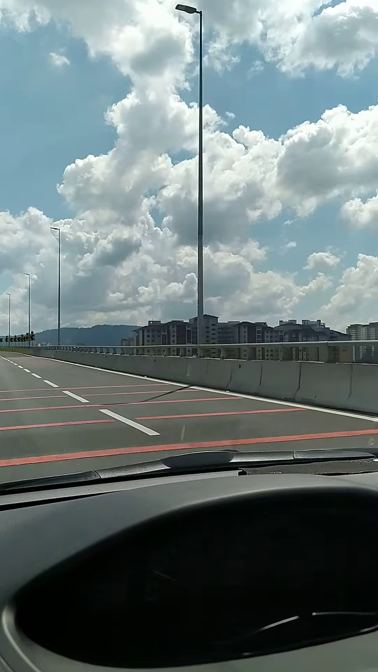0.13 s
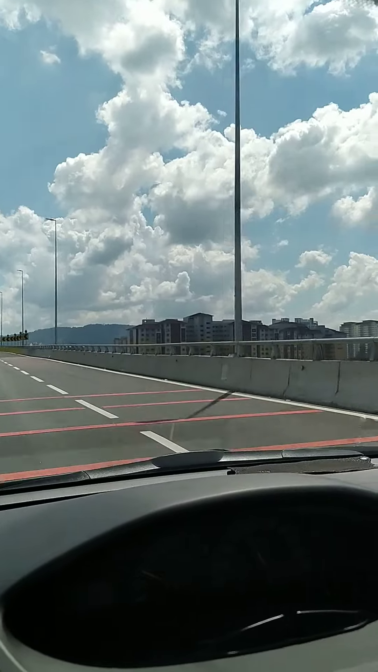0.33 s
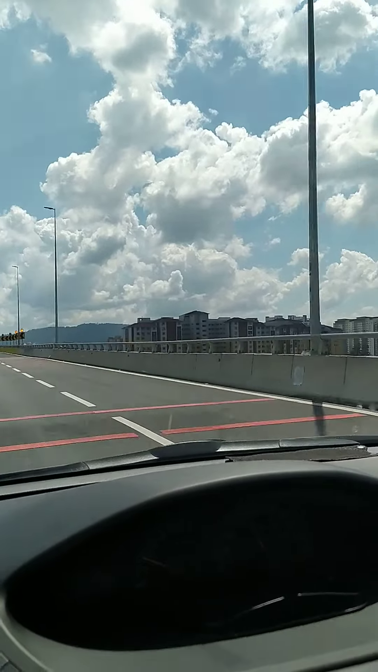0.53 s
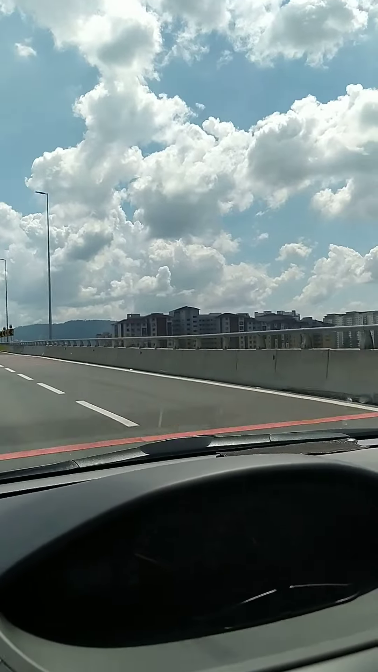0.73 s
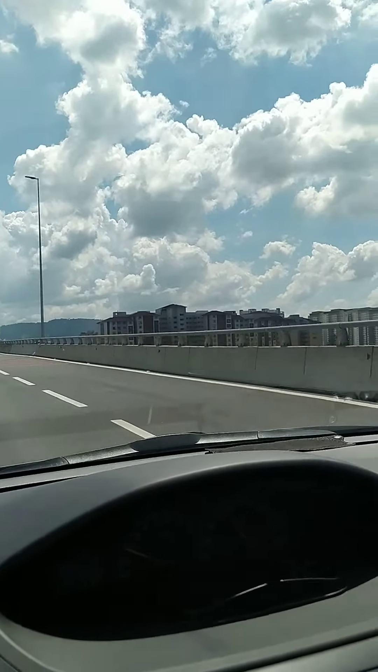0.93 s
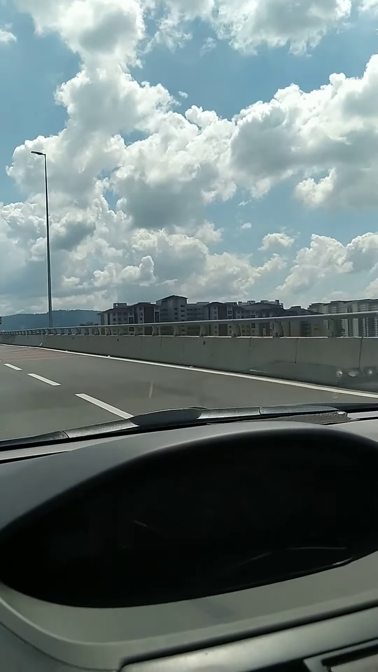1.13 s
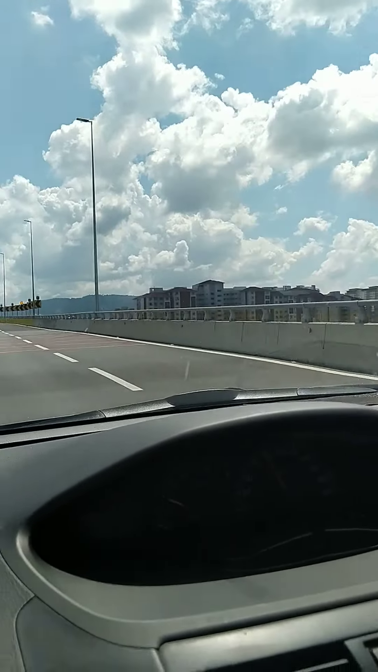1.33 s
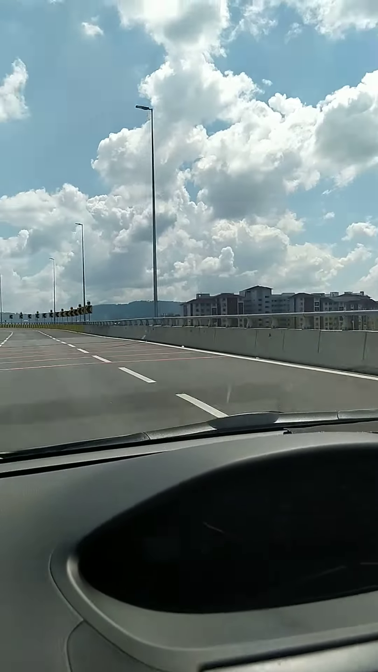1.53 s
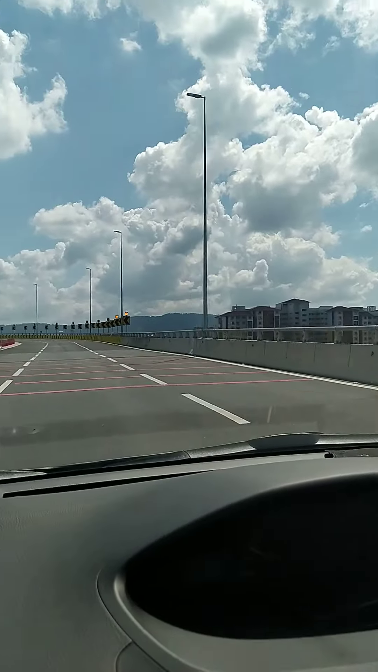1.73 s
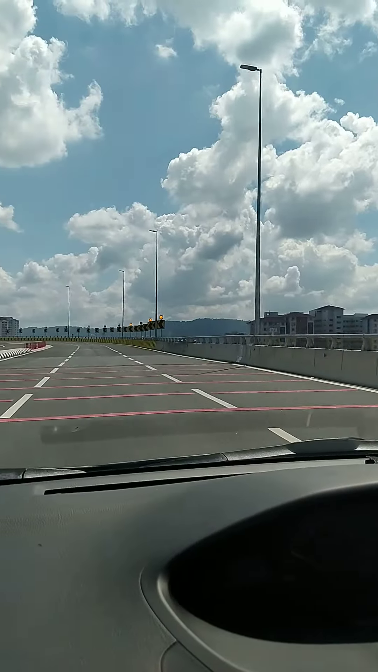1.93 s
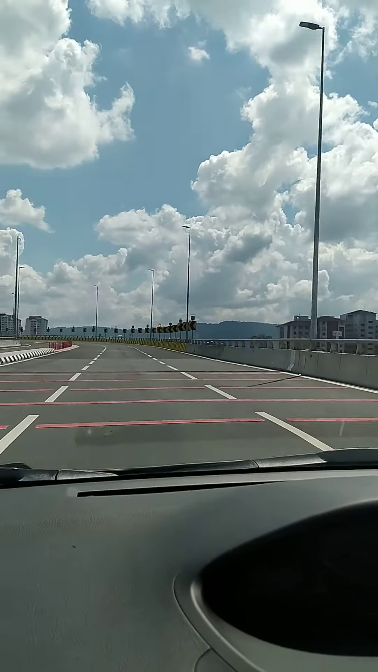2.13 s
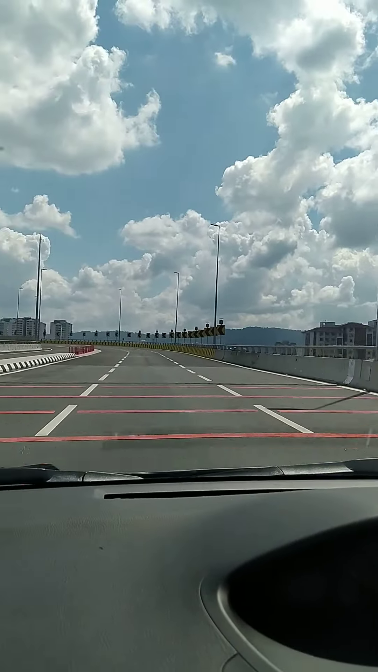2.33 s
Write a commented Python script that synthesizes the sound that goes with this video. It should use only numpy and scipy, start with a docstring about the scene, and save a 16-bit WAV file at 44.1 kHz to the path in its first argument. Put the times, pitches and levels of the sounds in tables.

```python
"""Car crossing raised strips

Inside a car at steady speed, front then rear tyres cross six evenly spaced raised strips, heard by a phone
near the dashboard. Impulses ring damped modes of the body shell, cabin panels and front wheel arch; shaped
noise bursts make loose trim rattle, and a last one gives a faint, very bright tick near the end. Behind them lie
road roar in flickering noise bands, narrow hums, a wavering drone and a brief treble rustle, in two channels."""
import sys
import numpy as np
from scipy import signal
from scipy.fft import rfft, irfft
from scipy.io import wavfile
from scipy.ndimage import uniform_filter1d

SR = 44100
rng = np.random.default_rng(int(sys.argv[2]) if len(sys.argv) > 2 else 0)


def dump_mix(stems):
    """Bounce the given channels to the path in sys.argv[1] as a 16-bit WAV at rate SR."""
    frames = np.atleast_2d(stems).T  # one column per channel
    limited = np.clip(frames, -1, 1)  # hard clip at full scale
    pcm = np.round(limited * 32767).astype(np.int16)
    wavfile.write(sys.argv[1], SR, pcm)


N = 108045
T = np.arange(N) / SR  # s
BIN_HZ = np.fft.rfftfreq(N, 1 / SR) + 1  # one hertz up, so that logarithms exist at zero

# Loose parts knocking on panels and wheel arch:
# (time [s], relative level on high modes and arch [dB], relative level on low modes [dB])
KNOCKS = [(.588, -34.5, -33), (0.487, -45, -31.5), (.515, -49, -30.5), (.624, -28.5, -30), (.650, -38, -24),
          (.783, -39, -32), (.804, -24.5, -21), (.841, -29.5, -36), (.875, -31, -27), (.935, -26.5, -22),
          (.958, -24, -25.5), (1.084, -28.5, -31), (1.111, -30, -24), (1.25, -28, -25.5),
          (1.283, -34, -25.5), (1.316, -41, -38), (1.410, -46, -25.5), (1.428, -24.5, -31.5),
          (1.481, -45, -25.5), (1.53, -37, -33)]


def undb(db):
    """Decibels are twenty times the decimal logarithm of an amplitude ratio."""
    return 10 ** (np.asarray(db) / 20)


def level(x, db):
    """Root-mean-square normalisation sets the level of a steady signal."""
    return x * undb(db) / np.sqrt(np.mean(x ** 2))


def along(table):
    """Interpolation on a logarithmic frequency axis reads a (frequency [Hz], value) table at every bin."""
    hz, value = np.array(table, float).T
    return np.interp(np.log(BIN_HZ), np.log(hz), value)


def ring(x, hz, t60):
    """A damped mode is a two-pole resonator: a unit kick gives a sine of initial swing 1 that decays."""
    radius = np.exp(-np.log(1000) / (t60 * SR))
    angle = 2 * np.pi * hz / SR
    return signal.lfilter([0, radius * np.sin(angle)], [1, -2 * radius * np.cos(angle), radius ** 2], x)


def band(x, hz, width):
    """A resonance passes a band whose width is its centre frequency over its quality factor."""
    return signal.lfilter(*signal.iirpeak(min(hz, .45 * SR), hz / width, fs=SR), x)


def walk(rate):
    """Low-passed noise: random levels held 1 / rate s and smoothed twice, with a spread near 1."""
    hold = int(SR / rate)
    steps = np.repeat(rng.standard_normal(N // hold + 1), hold)
    return 1.123 * uniform_filter1d(uniform_filter1d(steps, hold), hold)[:N]


def kicks(times, db):
    """Ideal impulses: one-sample blows excite all modes at once."""
    out = np.zeros(N)
    np.add.at(out, (np.asarray(times) * SR).astype(int), undb(db))
    return out


def soft(push):
    """Contact compliance: rubber and plastic spread a blow over a fraction of a millisecond."""
    return uniform_filter1d(uniform_filter1d(push, size=19), size=19)


def axles():
    """Wheelbase delay: each strip strikes the front tyres, then the rear tyres a fixed lag later."""
    first_strip_s, strip_period_s, axle_lag_s, strips = .4455, .15682, .14232, 6
    # Strength of the blow at each strip: (front axle [dB], rear axle [dB])
    strip_blows = [(-0.4, 0.1), (0, 0.9), (-2.5, -1), (-2.3, -1.2), (-2, -1.8), (-1.7, 1.2)]
    times = first_strip_s + strip_period_s * np.arange(strips)
    front_db, rear_db = np.array(strip_blows).T
    return kicks(times, front_db), kicks(times + axle_lag_s, rear_db)


def shell():
    """Modal superposition: each axle swings the body modes in its own fixed senses, as a deep boom."""
    # Body shell modes: (frequency [Hz], T60 [s], signed swing per unit front blow, per unit rear blow)
    shell_modes = [(20.11, 0.733, 0.035, 0.011), (25.14, 0.722, 0.05, -0.271),
                   (27.65, 0.635, -0.039, 0.338), (35.11, 0.588, -0.14, -0.241),
                   (43.42, 0.142, 0.102, 0.369), (50.78, 1.2, -0.044, 0.021), (66.48, 1.168, 0.02, -0.09),
                   (69.08, 0.699, -0.051, 0.091), (76.04, 1.2, -0.019, 0.036),
                   (87.73, 0.294, -0.007, 0.123), (101.32, 0.336, 0.023, 0.118),
                   (116.79, 1.2, -0.017, 0.029), (126.36, 1.2, 0.002, -0.022)]
    front, rear = axles()
    return sum(ring(front_swing * front + rear_swing * rear, hz, t60)
               for hz, t60, front_swing, rear_swing in shell_modes)


def panels():
    """Forced modal vibration: blows, the suspension's shudder and knocking parts ring the cabin panels."""
    kick_gain, shudder_gain, low_modes_hz = 0.33, 3.56, 380
    # Panel modes: (frequency [Hz], T60 [s], relative front-blow level [dB], relative rear-blow level [dB],
    # decay constant of the shudder [s])
    panel_modes = [(154, 0.24, -29, -31.5, 0.1), (191.7, 0.37, -31.5, -39.5, 0.097),
                   (238.8, 0.28, -33.5, -32, 0.046), (285, 0.081, -30, -39, 0.046),
                   (347, 0.092, -33, -43, 0.065), (415.5, 0.1, -30.5, -58, 0.031),
                   (485.5, 0.077, -36.5, -70, 0.045), (609, 0.055, -35, -56, 0.032),
                   (731, 0.062, -35, -39.5, 0.023), (906, 0.027, -35, -39.5, 0.025)]
    front, rear = axles()
    rows = np.array(KNOCKS)
    out = 0
    for hz, t60, front_db, rear_db, shudder_s in panel_modes:
        shake = rng.standard_normal(N)
        blows = undb(front_db) * front + undb(rear_db) * rear
        shudder = signal.lfilter([1], [1, -np.exp(-1 / (shudder_s * SR))], blows) / np.sqrt(shudder_s * SR)
        knock = kicks(rows[:, 0], rows[:, 2 if hz < low_modes_hz else 1])
        impacts = soft(kick_gain * blows + knock * np.sign(shake))  # each knock has a random sense
        out = out + ring(impacts + shudder_gain * shudder * shake, hz, t60)
    return out


def clunk():
    """Cavity resonance: front tyres climbing and leaving each strip, and knocking parts, ring a hollow arch."""
    crossing_s, drop_gain = 0.0083, 0.86  # the drop off the far edge: its delay and relative strength
    blow_db, knock_db = -26, -2  # gain of a front blow; share of a knock that reaches the arch
    # Modes of the hollow front wheel arch: (frequency [Hz], T60 [s], relative level [dB])
    arch_modes = [(423, 0.13, -16), (635, 0.066, -10.5), (699, 0.11, -0.5), (746, 0.096, -0.5),
                  (832, 0.049, -5.5)]
    rows, front = np.array(KNOCKS), axles()[0]
    drop = drop_gain * np.roll(front, int(crossing_s * SR))
    knock = kicks(rows[:, 0], rows[:, 1] + knock_db)
    push = soft(undb(blow_db) * (front + drop) + knock)
    return -sum(undb(db) * ring(push, hz, t60) for hz, t60, db in arch_modes)


def trim():
    """Impact noise: short grainy bursts, mostly loose plastic chattering, with its own grain in each octave."""
    rise_s, tail_s, tail_db = 0.0063, 0.055, -10.5  # the tail is a weaker, slower second decay
    bursts_db, grain_db, chatter_db = -12.5, 0.1, 2.5
    # Rattles, and last a faint, very bright tick near the end:
    # (onset [s], relative level [dB], decay constant [s], tilt about 4 kHz [dB per octave])
    noise_bursts = [(0.469, -40.5, 0.012, -3.5), (0.612, -36, 0.03, 0), (0.64, -34.5, 0.016, 1.3),
                    (0.665, -40, 0.022, 0), (0.694, -40, 0.014, -1), (0.754, -34, 0.021, 0.5),
                    (0.776, -27, 0.024, -0.5), (0.792, -25, 0.017, 1.2), (0.825, -29.5, 0.015, 0),
                    (0.867, -28.5, 0.0095, -1), (0.908, -36, 0.012, 0), (0.9346, -21.5, 0.013, 0.8),
                    (0.952, -24.5, 0.0069, 1.5), (0.984, -32.5, 0.014, 2.5), (1.028, -38.5, 0.012, 1),
                    (1.072, -34.5, 0.012, 1.5), (1.09, -30, 0.017, -0.5), (1.1083, -25.5, 0.0083, 4.5),
                    (1.17, -31, 0.0099, -0.5), (1.227, -32.5, 0.02, 1), (1.245, -30.5, 0.012, -0.5),
                    (1.259, -27, 0.024, 2), (1.297, -32.5, 0.016, 0), (1.337, -40, 0.02, 3),
                    (1.382, -33.5, 0.03, 1), (1.403, -28.5, 0.0099, -0.5), (1.4166, -22.5, 0.016, 0.8),
                    (1.454, -31.5, 0.02, -0.5), (1.488, -40, 0.013, 1), (2.431, -50, 0.014, 8)]
    # Colour of the bursts: (frequency [Hz], relative spectral density [dB per Hz])
    trim_colour = [(530, -14), (900, 1), (1200, 0), (1370, 2), (1910, -6.5), (2170, -3), (3140, -9.5),
                   (4180, -12), (5240, -16), (8550, -16), (9290, -15.5), (11400, -28.5), (11900, -38),
                   (15000, -45), (15500, -46)]
    # Resonant bumps in the colour: (frequency [Hz], width [Hz], height [dB])
    trim_bumps = [(1350, 140, 1.5), (2150, 250, 0), (4250, 150, 3.5), (9430, 650, 4)]
    rows = np.array(noise_bursts)
    # Power envelopes: an exponential rise, then the two decays
    since_peak = T - rows[:, :1] - rise_s
    twice_away = 2 * abs(since_peak)
    fall = np.exp(-twice_away / np.maximum(rows[:, 2:3], .002))
    fall = fall + undb(2 * tail_db) * np.exp(-twice_away / tail_s)
    shapes = np.where(since_peak < 0, np.exp(-twice_away / rise_s), fall)
    # Single contacts, 40 samples each, differ in size
    sizes = np.repeat(np.minimum(rng.exponential(size=N // 40 + 1), 3.0), 40)[:N]
    contacts = undb(chatter_db * sizes - chatter_db)
    bumps = sum(db / (1 + ((BIN_HZ - f) / width * 2) ** 2) for f, width, db in trim_bumps)
    gain = undb(along(trim_colour) + bumps) * np.minimum(BIN_HZ / 900, 1) ** 2
    gain = gain / np.sqrt(np.sum(gain[BIN_HZ > 2500] ** 2) / len(BIN_HZ))  # unit power in the treble
    place = np.clip(np.log2(BIN_HZ / 4000), -2, 2)  # octaves from 4 kHz
    out, shared = 0, walk(300)
    for octave in range(-2, 3):
        power = undb(2 * (rows[:, 1] + bursts_db + octave * rows[:, 3])) @ shapes
        roughness = undb(grain_db * shared + 1.15 * walk(60.0))
        grains = rng.standard_normal(N) * contacts * roughness
        share = np.sqrt(np.clip(1 - abs(place - octave), 0, 1))
        out = out + rfft(grains * np.sqrt(power)) * share
    return irfft(out * gain, N)


def road():
    """Filtered broadband noise: half-octave bands of tyre and wind roar flicker independently, over hums."""
    road_db, swell_db, flicker_db, treble_flicker_db = -26, 0.01, 2, 2  # the shared swell is minute
    hum_width_hz = 7.4
    # Roar over time: (time [s], bass lift below 120 Hz [dB], middle lift up to 3 kHz [dB])
    roar_course = [(0, -2.5, -0.5), (.4, -3.5, -0.5), (.62, 3.5, 1.5), (1.1, 7.5, 4.5), (1.45, 3, 3.5),
                   (1.56, 7, 0.5), (1.62, -2, 0.1), (1.8, 0, -0.5), (2.05, 1.5, 0), (2.25, -2, 0.5),
                   (2.45, -4, 0.6)]
    # Roar spectrum: (frequency [Hz], relative spectral density [dB per Hz])
    road_colour = [(16, -3.5), (43, 3), (60, -6), (76, -11), (113, -4), (151, -9), (190, -5.5),
                   (232, -13.5), (284, -11.5), (338, -20.5), (368, -17.5), (600, -24.5), (756, -24.5),
                   (1200, -32.5), (1420, -36), (1900, -38.5), (2400, -43), (2900, -48.5), (3800, -49.5),
                   (5190, -52.5), (7500, -51), (9230, -47.5), (10500, -56), (11500, -69.5), (13800, -81),
                   (15500, -82)]
    # Engine and tyre-cavity tones: (frequency [Hz], rms level [dB])
    hum_tones = [(188.4, -49), (242.2, -41), (366, -51)]
    rows = np.array(roar_course)
    white = rfft(rng.standard_normal(N))
    swell, out = walk(3.62), 0
    coloured = white * undb(along(road_colour)) * np.minimum(BIN_HZ / 16, 1) ** 2
    scale = undb(road_db) / np.std(irfft(coloured, N))
    for centre in 16 * 2 ** np.arange(0, 10.1, .5):
        share = np.clip(1 - 2 * abs(np.log2(BIN_HZ / centre)), 0, 1)
        lift = np.interp(T, rows[:, 0], rows[:, 1 if centre < 120 else 2])
        common = (lift + swell_db * swell) * (centre < 3000)
        flicker = (flicker_db if centre < 1500 else treble_flicker_db) * walk(12.05)
        out = out + irfft(coloured * share, N) * undb(common + flicker)
    hum = sum(level(band(rng.standard_normal(N), f, hum_width_hz), db) for f, db in hum_tones)
    return scale * out + hum


def drone():
    """Frequency modulation: a low sine wavers in pitch and level as it comes and goes."""
    pitch_hz, waver_hz = 102.3, 4.25
    # Level course: (time [s], mean rms level [dB])
    drone_course = [(0, -39.5), (1.45, -38), (1.582, -31), (1.82, -34), (2.0, -48.5), (2.45, -41.5)]
    rows = np.array(drone_course)
    phase = 2 * np.pi * np.cumsum(pitch_hz + waver_hz * walk(15)) / SR
    tone = np.sin(phase) * np.sqrt(2)  # unit rms
    return tone * undb(np.interp(T, rows[:, 0], rows[:, 1]) + 2.0 * walk(10.14))


def rustle():
    """Band-limited noise under a Gaussian envelope: a brief, soft, flickering treble rustle."""
    peak_s, spread_s, centre_hz, width_hz, steady_db = 0.063, 0.045, 7600, 3800, -49.5
    once = band(rng.standard_normal(N), centre_hz, width_hz)
    hiss = level(band(once, centre_hz, width_hz), steady_db)
    return hiss * np.exp(-((T - peak_s) / spread_s) ** 2) * undb(2.0 * walk(110))


def spread(mid, other):
    """Interchannel coherence: a second draw of the cabin sound, as side signal, sets two microphones apart."""
    # Coherence: (frequency [Hz], left-right correlation aimed at)
    ear_likeness = [(60, 0.99), (130, 1), (290, 0.94), (640, 0.49), (1410, -0.04), (3100, -0.14),
                    (6820, 0.026), (15000, 0.072)]
    # Balance: (frequency [Hz], left minus right level [dB])
    ear_lean = [(60, -0.1), (110, -1.3), (200, -0.5), (380, -4), (700, 2), (1290, 1), (2380, 0.3),
                (4400, 0), (8120, -1), (10500, -9), (12500, -17), (15000, -9)]
    correlation = np.clip(along(ear_likeness), -.99, .999)
    lean = undb(along(ear_lean) / 2)
    middle = rfft(mid)
    side = rfft(other) * np.sqrt((1 - correlation) / (1 + correlation))
    return irfft(np.array([(middle + side) * lean, (middle - side) / lean]), N)


def cabin():
    """Superposition: each call draws fresh noise and knock senses; the panel blows stay alike."""
    return panels() + trim() + road() + rustle()


def scene():
    """Linear superposition of centred and spread sources, with short fades at both ends."""
    samples = np.arange(N)
    edge = np.minimum(np.minimum(samples, samples[::-1]) / 150, 1)
    centred = shell() + drone() + clunk()
    return spread(edge * (centred + cabin()), edge * cabin())


def record(dry):
    """Band limiting and saturation: the phone drops the deepest sway, rounds loud peaks and cuts the top."""
    rounding, top_hz = 0.45, 15400
    dry = signal.sosfilt(signal.butter(1, 6, "high", fs=SR, output="sos"), dry)
    rounded = np.tanh(rounding * dry) / rounding
    return signal.sosfilt(signal.ellip(8, .2, 70, top_hz, fs=SR, output="sos"), rounded)


dry = scene()
out = record(dry)
dump_mix(out)
```